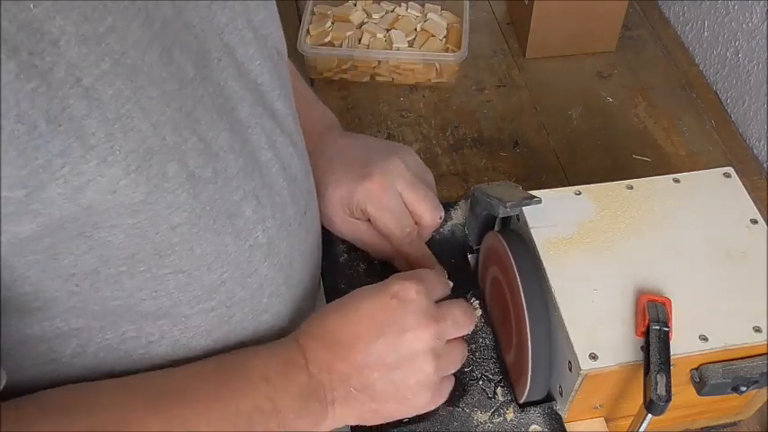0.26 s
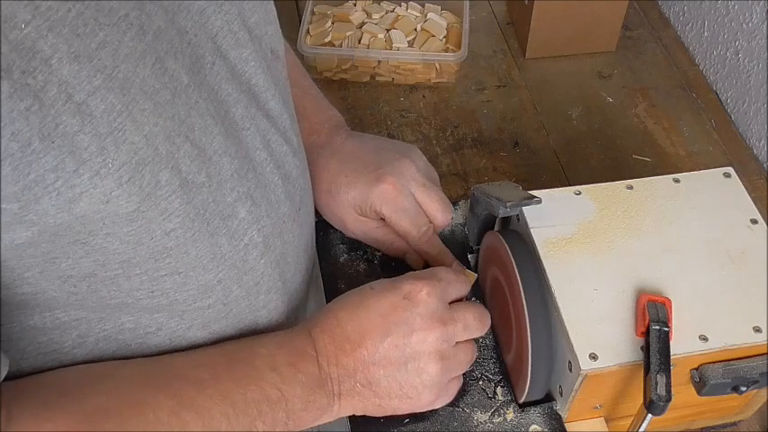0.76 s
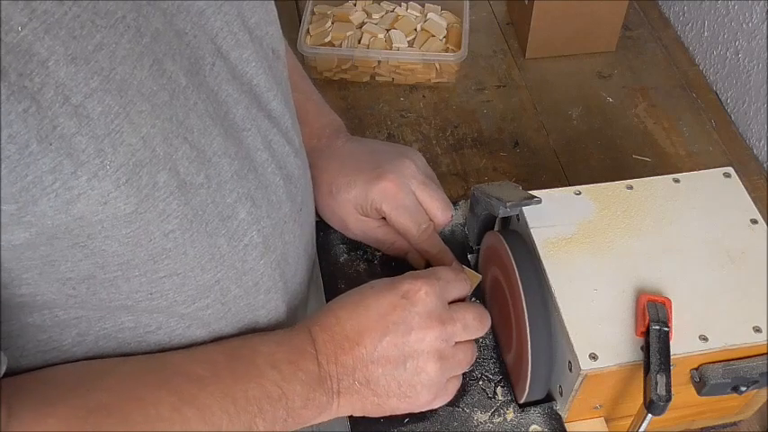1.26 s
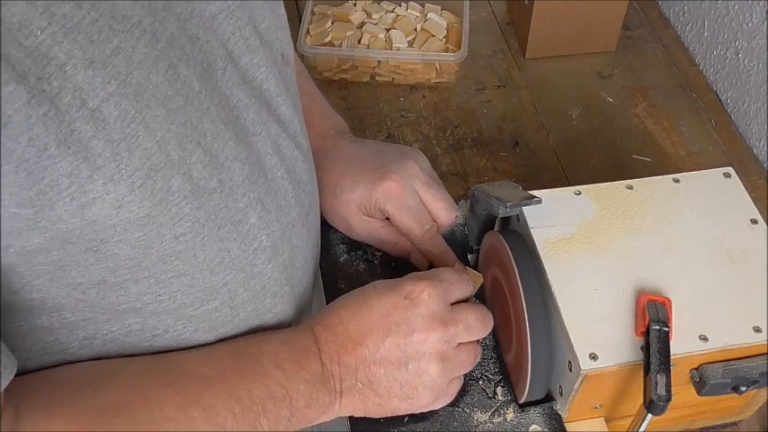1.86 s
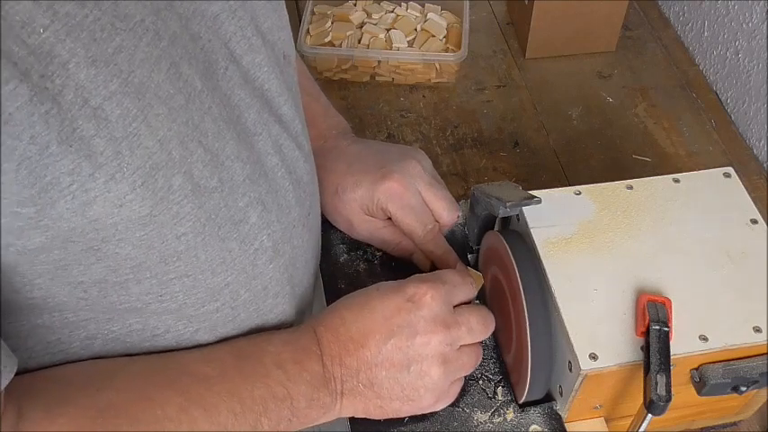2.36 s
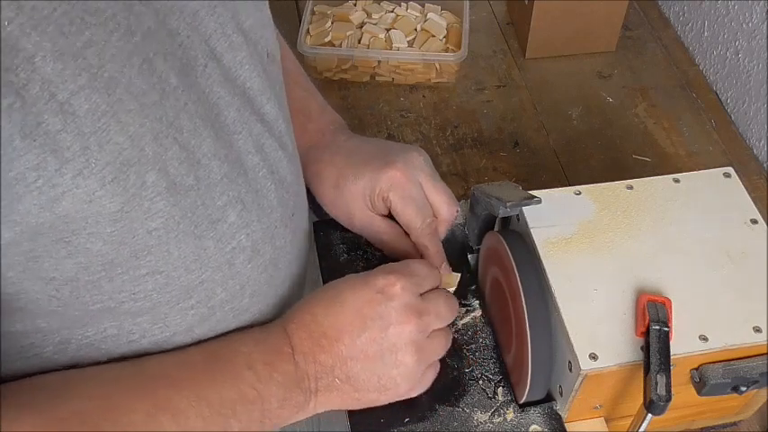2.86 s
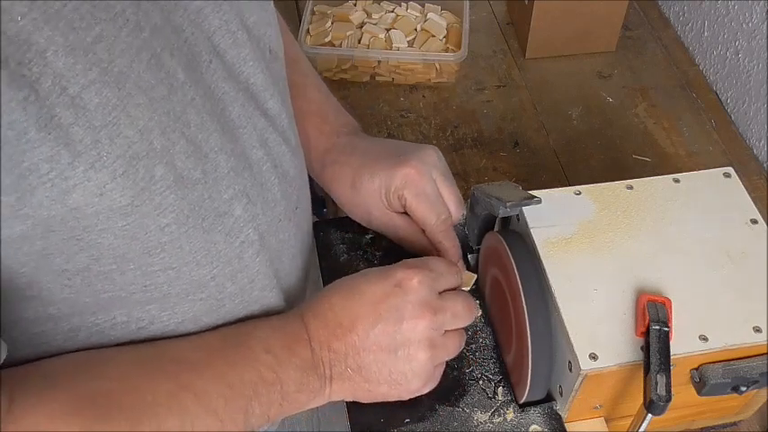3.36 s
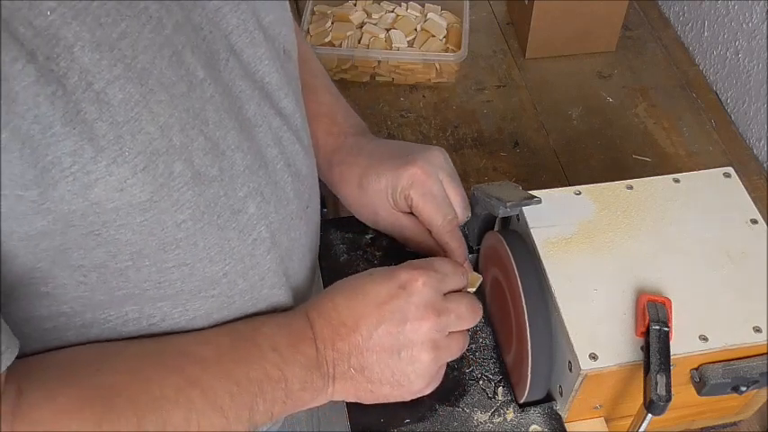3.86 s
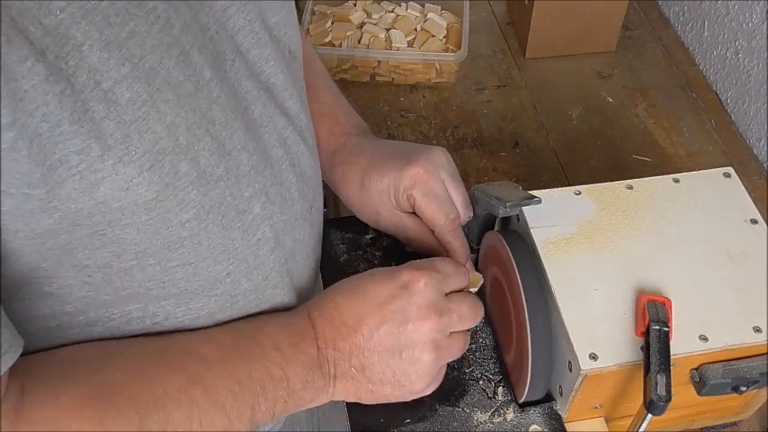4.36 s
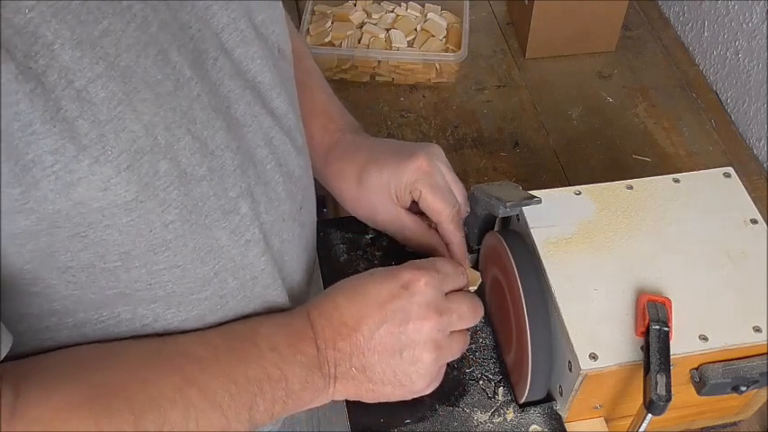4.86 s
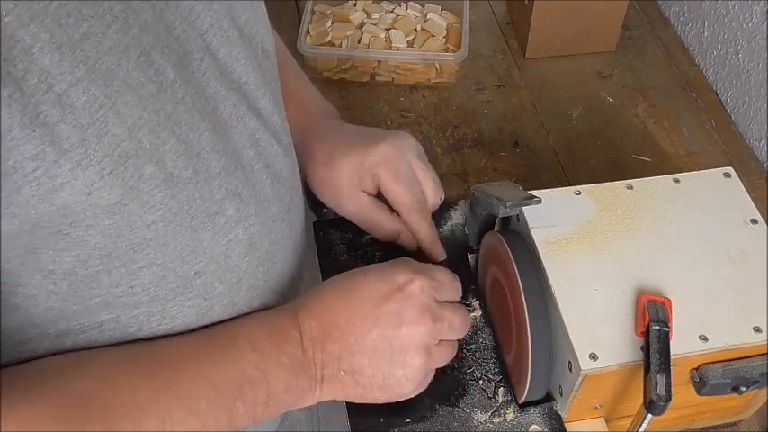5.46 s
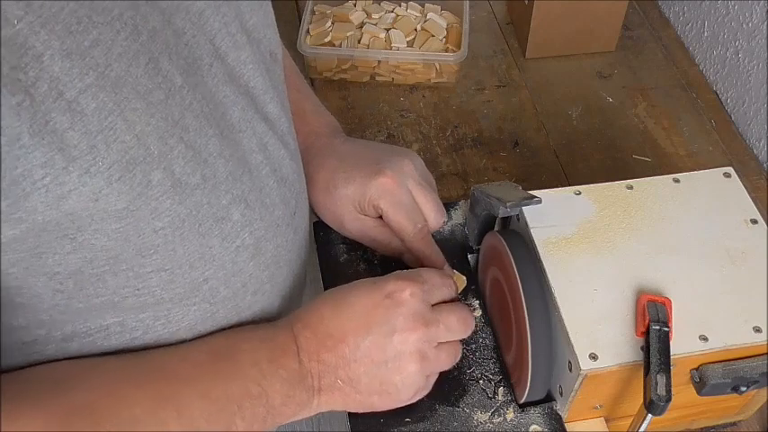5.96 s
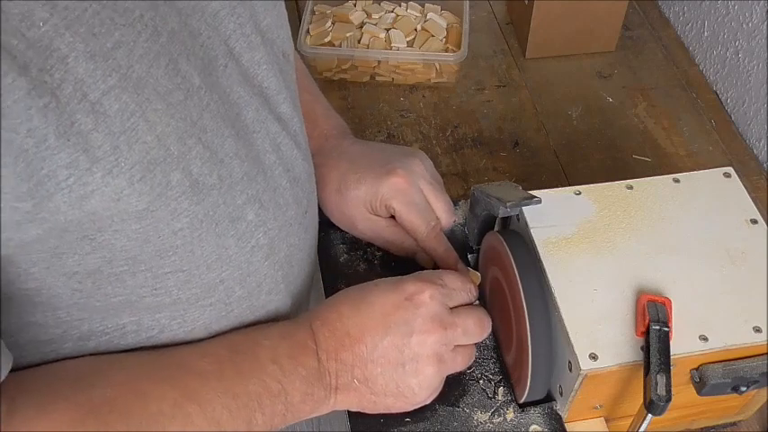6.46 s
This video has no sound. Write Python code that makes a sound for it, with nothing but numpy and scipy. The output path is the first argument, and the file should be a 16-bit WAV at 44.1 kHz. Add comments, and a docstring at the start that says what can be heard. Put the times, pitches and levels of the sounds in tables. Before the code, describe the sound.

Close up, a small belt-driven disc sander runs with a wavering hum, low rumble and chattering hiss. Wood clicks once on the table at the start. Then a small wooden piece is pressed on, rasping in a fast gritty flutter as the motor sags; it lifts, the motor recovers, and a second piece is ground the same way. Small workshop with short reflections, close stereo microphones.

```python
"""Disc sander on a workbench

Close by, a small belt-driven disc sander hums and rattles; a piece of wood knocks the table at the start.
Hum is a sum of shaft tones; rumble and rattle are filtered noise that throbs with motor and disc.
Two wooden pieces are pressed on in turn: the disc runs out of true, so one arc of looped grit noise
rasps the wood once a turn while the load drags the speed down. Near reflections and a short tail differ
at the two microphones; the recorder's gain control ducks everything at loud peaks, then lets it swell back."""
import sys
import numpy as np
from scipy import signal
from scipy.fft import rfft, irfft
from scipy.io import wavfile

SR = 44100
rng = np.random.default_rng(int(sys.argv[2]) if len(sys.argv) > 2 else 0)


def transcribe(signal):
    """Save signal, clipped to [-1, 1], as a 16-bit WAV file at the path in sys.argv[1]."""
    frames = np.atleast_2d(signal).T
    limited = np.clip(frames, -1, 1)
    pcm = np.round(limited * 32767).astype(np.int16)
    wavfile.write(sys.argv[1], SR, pcm)


N = 295470
TIME = np.arange(N) / SR  # s

MOTOR_RATIO, CAGE_RATIO = 2.5807, .362  # turns of motor and of bearing cage per disc turn
HIGH_SPOT = .233  # turns from the start until the high side of the disc comes round
IDLE_HZ, INERTIA_S = 58.68, .5  # unloaded disc turns per second; time constant of its slowing
FIRST_FORCE, EASE_S = .07, .1  # share of full force at the touch; time to ease off, s
# contact level against full force: at the first touch, at no force, at the end of the withdrawal (dB)
TOUCH_DB, LIGHT_DB, GONE_DB = -29.5, -2, -42
BITE_S = 0.01  # the contact level jumps or dips briefly as the piece seats
DAMPING_DB = -6  # a firm hand damps the whine
EDGE_HZ = 15760  # upper band limit of the recorder

# hiss of the loose drive, also colours the wood knock: (frequency [Hz], relative density [dB per Hz])
RATTLE_COLOUR = [(800, -4.5), (1800, 0.5), (3000, -1.5), (3600, -0.5), (4200, -3), (5400, 4), (6400, -2),
                 (7900, 4.5), (9000, -1), (9600, -1), (11000, -5.5), (13000, -14), (16000, -27)]
# each piece leaned into the disc:
# (touch [s], ease off [s], time to full force [s], settled drag at full force [turns per second])
PASSES = [(1.325, 2.51, .846, 11.47), (3.785, 4.87, .665, 11.0)]


def gain_of(db):
    """Decibels to an amplitude factor."""
    return 10 ** (np.asarray(db) / 20)


def evened(x):
    """Scales to rms 1."""
    return x / np.sqrt(np.mean(x ** 2) + 1e-20)


def read(points, hz):
    """Reads a spectrum on a log-frequency axis."""
    f, value = np.transpose(points)
    return np.interp(np.log(hz + 1), np.log(f + 1), value)


def colour(x, spectrum):
    """Filters by a spectrum, keeping the power of white noise."""
    response = gain_of(read(spectrum, np.fft.rfftfreq(N, 1 / SR)))
    return irfft(rfft(x) * evened(response), N)


def drift(hz):
    """Random wandering of rms 1, up to about hz."""
    f = np.fft.rfftfreq(N, 1 / SR)
    return evened(irfft(rfft(rng.standard_normal(N)) * np.exp(-(f / hz) ** 2), N))


def resonate(x, hz, width):
    """A resonance of gain 1 whose frequency may follow a curve."""
    turn = np.exp(2j * np.pi * np.cumsum(hz * np.ones(N)) / SR)
    r = np.exp(-np.pi * width / SR)
    # shift the resonance to 0 Hz, smooth, and shift back
    return 2 * (turn * signal.lfilter([1 - r], [1, -r], x / turn + 1e-18)).real


def band(x, hz, width):
    """A resonance with steep skirts: two wider ones in a row."""
    return resonate(resonate(x, hz, 1.55 * width), hz, 1.55 * width)


def bursts(rows, decay):
    """A short dying burst of noise for each (s, dB) row."""
    size = sum(gain_of(db) * (TIME >= s) * np.exp(-abs(TIME - s) / decay) for s, db in rows)
    return size * rng.standard_normal(N)


def workshop(x, wet_db, early_db, size=16000, count=24):
    """Near reflections off bench and housing and a short tail, different at each microphone."""
    # decay of the room: (frequency [Hz], time to fall by 60 dB [s])
    room_decay = [(100, 0.22), (1000, 0.77), (5000, 0.39), (15000, 0.058)]
    # near reflections at the microphones vary with frequency: (frequency [Hz], relative level [dB])
    near_colour = [(100, -8.5), (1000, -7.5), (2500, -16), (4500, -8.5), (8000, -6), (15000, 4)]
    taps = rng.choice([-1., 1.], (2, size)) * (rng.random((2, size)) < .06)
    hz, t, z = signal.stft(taps, SR, nperseg=256)
    fall_db = -60 * t / read(room_decay, hz)[:, None]
    tail = signal.istft(z * gain_of(fall_db), SR, nperseg=256)[1]
    echo = signal.fftconvolve(x[None], tail / np.linalg.norm(tail[0]), axes=1)[:, :N]
    near = np.zeros(256)
    near[rng.integers(4, 200, count)] = rng.choice([-1., 1.], count) / np.sqrt(count)
    side = gain_of(early_db) * colour(signal.oaconvolve(x, near)[:N], near_colour)
    return x + gain_of(wet_db) * echo + np.array([side, -side])


def hand_force(touch, ease, lean):
    """Force on a piece, 0-1: a light touch, a steady lean into the disc, a quick easing off."""
    leaning = np.interp(TIME, [touch, touch + lean], [FIRST_FORCE, 1])
    easing = np.interp(TIME, [ease, ease + EASE_S], [1, 0])
    return (TIME > touch) * leaning * easing


def disc_speed():
    """Turns per second: the force of the hand drags the disc below idle, smoothed by its inertia."""
    load = sum(drag * hand_force(touch, ease, lean) for touch, ease, lean, drag in PASSES)
    keep = np.exp(-1 / (SR * INERTIA_S))
    return IDLE_HZ - signal.lfilter([1 - keep], [1, -keep], load)


def rumble(turns, level_db=-31, throb=0.31):
    """Rolling noise of bearings and belt, throbbing with the motor, through the housing and its panels."""
    # rumble of the wooden housing: (frequency [Hz], relative density [dB per Hz])
    housing = [(20, -25), (80, -28), (200, -14), (260, -7.5), (400, -10), (520, -9.5), (650, -2.5),
               (780, -10.5), (1050, -8), (1250, -14.5), (1450, -21.5), (1900, -35), (3000, -35.5),
               (8000, -70)]
    # resonances of the housing: (frequency [Hz], width [Hz], relative level [dB])
    panel_modes = [(266, 14.6, -46), (501.3, 14.3, -43.5)]
    roll = rng.standard_normal(N) * (1 + throb * np.cos(2 * np.pi * MOTOR_RATIO * turns))
    panels = sum(gain_of(db) * evened(band(roll, hz, w)) for hz, w, db in panel_modes)
    return gain_of(level_db) * evened(colour(roll, housing)) + panels


def hum(turns, speed, waver=0.17, slip=0.0097, fade=0.55):
    """Motor and disc shake the housing; the belt couples them into combination tones, higher ones waver more."""
    # hum lines: (multiple of the motor rate, multiple of the disc rate, relative level [dB])
    lines = [(0, 1, -36.5), (0, 2, -41), (0, 3, -47), (0, 6, -43), (0, 7, -42), (0, 8, -40.5), (0, 9, -41),
             (0, 10, -42), (0, 14, -48), (1, 0, -45.5), (1, 2, -47), (1, 6, -50), (2, 0, -42),
             (2, 1, -43.5), (2, 2, -49.5), (2, 4, -43.5), (2, 5, -40.5), (3, 0, -40.5), (3, 1, -37.5),
             (4, -3, -41), (4, 0, -37), (4, 1, -41), (4, 3, -44), (5, 3, -48), (5, 4, -44.5), (5, 6, -53.5),
             (6, 0, -50), (6, 1, -53), (7, 3, -46.5)]
    # resonances of bench and housing lift a line as it passes: (frequency [Hz], width [Hz], lift [dB])
    bench = [(55, 2.4, 1), (107.7, 5.9, 3), (258, 4.5, 6), (360.5, 4.3, 11), (501.4, 12, 6.5), (626, 37, 5)]
    motor = MOTOR_RATIO * turns + slip * drift(4.4)  # slip in motor turns
    out = np.zeros(N)
    for of_motor, of_disc, db in lines:
        order = round(of_motor) * MOTOR_RATIO + round(of_disc)
        height = min(order / 6, 1.5)
        lift = 1 + sum((gain_of(peak) - 1) / (1 + (2 * (order * speed - hz) / w) ** 2)
                       for hz, w, peak in bench)
        # high lines die away as the machine slows
        size = gain_of(db) * lift * (speed / speed.max()) ** (fade * height)
        size = size * (1 + waver * height * (drift(19.0) + 1j * drift(12.7)))
        cycles = round(of_motor) * motor + round(of_disc) * turns + rng.random()
        out += np.sqrt(2) * (size * np.exp(2j * np.pi * cycles)).real
    return out


def rattle(turns, hiss_db=-36, chatter_db=7, disc_db=2, cage_db=1.5, uneven_db=3.0, tick_db=5):
    """The drive chatters once a motor turn, swaying with disc and bearing cage; the pulley rings."""
    # ring of the pulley: (frequency [Hz], width [Hz], relative level [dB])
    pulley = [(2342, 192, -41.5), (2550, 45, -65)]
    # sharper ticks of the drive: (time [s], relative level [dB])
    ticks = [(0.1137, -33), (0.2324, -34), (0.286, -33), (0.5756, -28), (0.847, -26), (1.2043, -34),
             (1.222, -25)]
    chatter = np.exp(-(MOTOR_RATIO * turns % 1) / 0.48)
    sway = disc_db * np.cos(2 * np.pi * turns) + cage_db * np.cos(2 * np.pi * CAGE_RATIO * turns)
    sway = sway + uneven_db * drift(104)
    scrape = evened(rng.standard_normal(N) * (1 + gain_of(chatter_db + sway) * chatter))
    scrape = scrape + bursts(ticks, decay=0.0012) * gain_of(tick_db - hiss_db)
    ring = sum(gain_of(db) * evened(band(scrape, hz, w)) for hz, w, db in pulley)
    return gain_of(hiss_db) * evened(colour(scrape, RATTLE_COLOUR)) + ring


def knock():
    """Wood touches the table: a dry click of noise excites two brief resonances."""
    # touches: (time [s], relative level [dB])
    touches = [(0.0579, -15)]
    click = bursts(touches, decay=0.0028)
    ring = 3 * resonate(click, 1450, 120) + 3.6 * resonate(click, 3630, 300)
    return 0.48 * colour(click, RATTLE_COLOUR) + ring


def grit(turns, coarse_db, renew_hz, size=760, count=24):
    """A ring of grains that comes round again each turn; the wood slides slowly on to fresh tracks."""
    # patches of four grains share a random extra height
    grain_db = coarse_db * np.minimum(rng.exponential(1, (count, size // 4)), 4)
    tracks = rng.standard_normal((count, size)) * gain_of(np.repeat(grain_db, 4, axis=1))
    track = TIME * renew_hz
    near, share = track.astype(int), track % 1 * np.pi / 2
    fine = signal.resample(tracks, 8 * size, axis=1)
    at = (turns % 1 * fine.shape[1]).astype(int)
    # equal-power crossfade from one track to the next
    return evened(np.cos(share) * fine[near % count, at] + np.sin(share) * fine[(near + 1) % count, at])


def contact(row, attack_s, bite_db, withdraw_s):
    """One pass as (age s, force 0-1, contact dB): the piece seats, is held ever more firmly, is drawn away."""
    touch, ease, lean, _ = row
    age, force = TIME - touch, hand_force(touch, ease, lean)
    seating = TOUCH_DB * np.clip(1 - age / attack_s, 0, 1)
    # a positive bite catches as the piece seats, a negative one slackens
    seating = seating + bite_db * np.exp(-abs(age - attack_s) / BITE_S)
    leaving = GONE_DB * (np.maximum(TIME - ease, 0) / withdraw_s) ** 2
    return age, force, np.maximum(seating + LIGHT_DB * (1 - force) + leaving, -140)


def sanding(turns, press, wood, level_db, arc, between_db, ring_hz, stiffen_hz, ring_db, whine_db,
            edge_db, wear=0.17):
    """The disc's high side bites and trails off; pressure widens the arc (turns) and raises the wood's ring."""
    # bright scratch of single grains on a fresh edge: (frequency [Hz], relative density [dB per Hz])
    scratch_colour = [(1500, -0.5), (3500, 7.5), (10000, -18), (16000, 0)]
    # fine waviness of the paper whines: (multiple of the disc rate, relative level [dB])
    waviness = [(26, -1), (27, 2.5), (28, 1.5), (29, -5)]
    age, force, contact_db = press
    pressure = gain_of(contact_db)
    level = gain_of(level_db) * pressure * (age > 0)
    half_arc = arc * pressure ** 0.48
    along = ((turns + .4) % 1 - .4) / half_arc  # place in the arc, 0 at the high spot
    bite = np.where(along < 0, np.exp(-along ** 10), np.exp(-along ** 4))
    trail = gain_of(between_db) * np.sqrt(pressure) * np.exp(-((turns - half_arc) % 1) / 0.71)
    teeth = grit(turns, coarse_db=3.3, renew_hz=2.5) + .4 * rng.standard_normal(N)
    scrape = evened(teeth) * (bite + trail) * level / np.sqrt(2 * half_arc)
    rasp = colour(scrape, wood)
    sharpness = np.exp(-abs(age) / wear)  # the fresh corner soon wears off
    scratch = gain_of(edge_db) * colour(scrape * sharpness, scratch_colour)
    whine = sum(gain_of(db) * (1 + 0.24 * drift(5.1))
                * np.cos(2 * np.pi * (round(k) * turns + rng.random())) for k, db in waviness)
    whine = gain_of(whine_db + DAMPING_DB * force) * level * whine
    modes = gain_of(ring_db) * band(rasp, ring_hz + stiffen_hz * force ** 2, 1050)
    modes = modes + gain_of(6.5) * band(rasp, 2662, 48)
    return rasp + scratch + modes + whine


def scene():
    """The machine, quieter as it slows, and the two pieces being sanded."""
    # rasp of each piece: (frequency [Hz], relative density [dB per Hz])
    wood_first = [(200, -22), (700, -14), (1500, -13.5), (2000, -7), (2600, -12), (3300, -6.5), (4200, -5),
                  (5600, -1.5), (7400, 6.5), (9000, 0), (11000, -3.5), (12500, -9), (14000, -23),
                  (16000, -8.5)]
    wood_second = [(200, -26), (700, -25.5), (1500, -13.5), (2000, -10), (2900, -15), (3700, -6),
                   (5300, -3.5), (7000, 2), (8200, 4.5), (10000, -1), (11300, -1), (12500, -6),
                   (15000, -8.5), (16000, -52)]
    # stereo width of the rasp's treble: (frequency [Hz], relative density [dB per Hz])
    width_colour = [(2000, -45), (4000, -28), (7500, 9), (10000, 25), (13000, -8), (16000, -37)]
    speed = disc_speed()
    turns = np.cumsum(speed) / SR - HIGH_SPOT
    effort = (speed / speed.max()) ** 0.07
    drone = workshop(hum(turns, speed), wet_db=-40, early_db=-11.0) * gain_of([[-.3], [.3]])
    noise = workshop(effort * rumble(turns), wet_db=-8, early_db=-3) * gain_of([[-.5], [.5]])
    clatter = workshop(effort * rattle(turns) + knock(), wet_db=-10.0, early_db=1.5)
    first_press = contact(PASSES[0], attack_s=0.1, bite_db=3.5, withdraw_s=0.25)
    first = sanding(turns, first_press, wood_first, level_db=-6, arc=0.19, between_db=-10,
                    ring_hz=4150, stiffen_hz=550, ring_db=1.5, whine_db=-21, edge_db=-4.5)
    second_press = contact(PASSES[1], attack_s=0.072, bite_db=-4.5, withdraw_s=0.13)
    second = sanding(turns, second_press, wood_second, level_db=-6.5, arc=0.29, between_db=-11.0,
                     ring_hz=3640, stiffen_hz=995, ring_db=-4.5, whine_db=-24, edge_db=-15)
    rasp = workshop(first + second, wet_db=-7.0, early_db=-4.5) * gain_of([[-.2], [.2]])
    # noise that follows the rasp, opposite in sign at the two microphones
    width = gain_of(-12) * colour((first + second) * rng.standard_normal(N), width_colour)
    return drone + noise + clatter + rasp + np.array([width, -width])


def record(dry, ceiling_db=-16, recovery_db=20, grip=0.5, ahead=0.0042, size=128):
    """Gain control looks ahead, pulls peaks down quickly, recovers at a steady dB a second; then a band limit."""
    blocks = abs(dry[:, :N // size * size]).max(0).reshape(-1, size)
    peak_db = 20 * np.log10(blocks.max(1) + 1e-9)
    duck_db, now = [], 0.
    for level in peak_db:
        excess_db = max(level + now - ceiling_db, 0)
        now = min(now - min(grip, 1) * excess_db + recovery_db * size / SR, 0)
        duck_db.append(now)
    ducked = dry * gain_of(np.interp(TIME + ahead, np.arange(len(duck_db)) * size / SR, duck_db))
    low_pass = signal.firwin(1023, EDGE_HZ, window=("kaiser", 9), fs=SR)
    return signal.oaconvolve(ducked, low_pass[None], "same")


dry = scene()
out = record(dry)
transcribe(out)
```